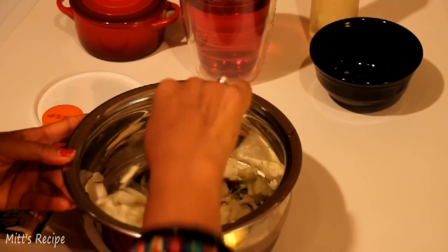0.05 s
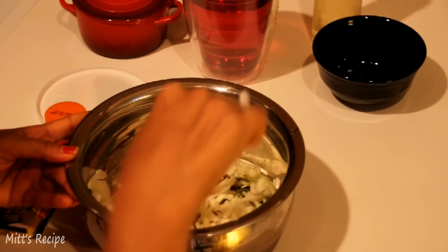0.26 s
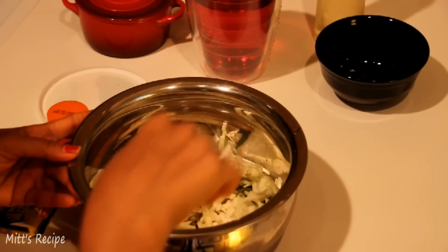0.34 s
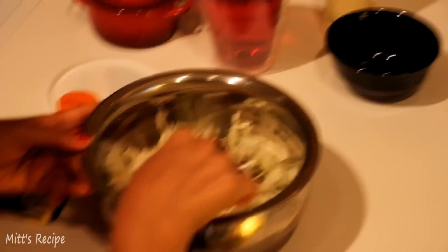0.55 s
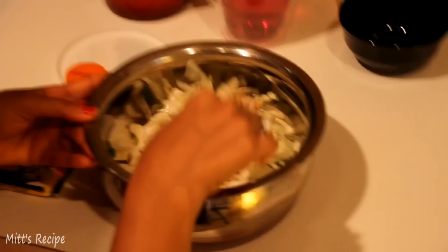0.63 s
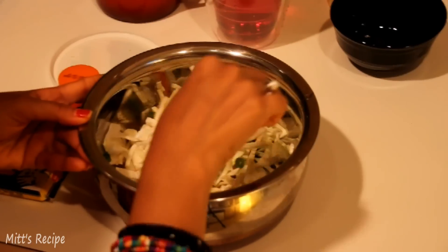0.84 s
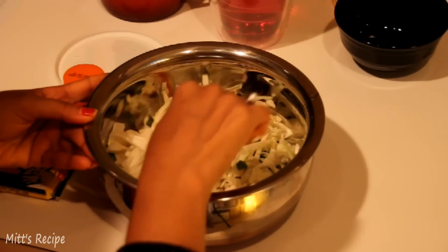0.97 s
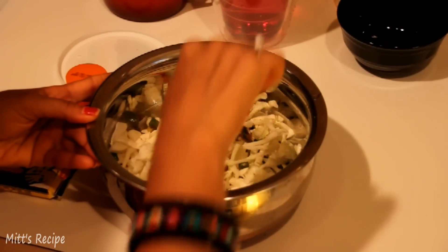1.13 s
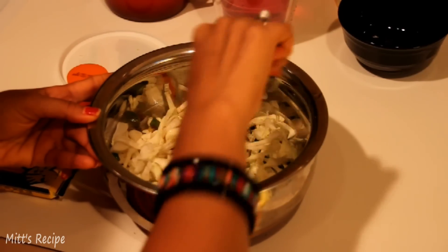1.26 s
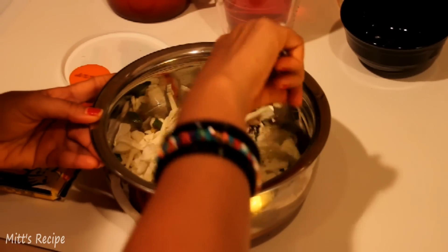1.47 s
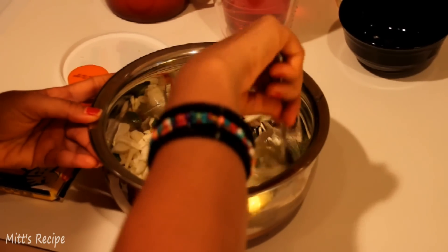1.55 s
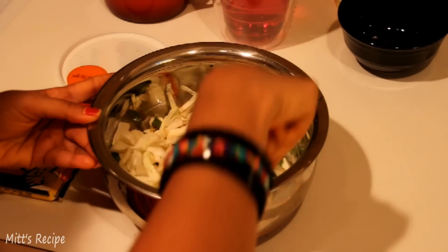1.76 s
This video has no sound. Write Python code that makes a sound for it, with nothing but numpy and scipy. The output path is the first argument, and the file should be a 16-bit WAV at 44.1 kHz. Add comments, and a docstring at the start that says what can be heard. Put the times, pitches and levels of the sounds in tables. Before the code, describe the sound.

A steel bowl bumps a kitchen counter several times while wet cabbage is mixed by hand.

```python
"""A faint wet rustle, then dull knocks: a hand turns shredded cabbage and batter in a steel bowl.
The held bowl bumps the kitchen counter, a low thump under a short, damped ring of steel.
Between knocks the shreds slide, air fizzes, wet fingers squeak, and a chirpy pop meets a soft bump.
Once something hard, probably a finger ring, clinks on the rim and sets it shimmering.
It all sits in the reverb of a small room, over a bed of low noise and mains hum."""
import sys
import numpy as np
from scipy import signal
from scipy.fft import rfft, irfft
from scipy.io import wavfile

SR = 44100
rng = np.random.default_rng(int(sys.argv[2]) if len(sys.argv) > 2 else 0)


def generate_wav(signal):
    """Clip the signal to [-1, 1] and save it as 16-bit WAV at the path in sys.argv[1]."""
    frames = np.transpose(np.atleast_2d(signal))
    scaled = np.clip(frames, -1, 1) * 32767
    pcm = np.round(scaled).astype(np.int16)
    wavfile.write(sys.argv[1], SR, pcm)


N = 79380
T = np.arange(N) / SR

# Levels within a table are relative; each layer's gain and filters come on top.
# Spectrum of the room tone: frequency_hz, level_db
ROOM_TONE_SPECTRUM = [(40, -6), (80, -3.5), (130, -4), (180, 2.5), (230, -2), (310, 2), (450, -8),
                      (1000, -7.5), (2000, -15.5), (5000, -23.5), (15000, -33.5)]
# Spectrum of the kitchen's reverb: frequency_hz, level_db
REVERB_SPECTRUM = [(100, -16), (300, 5.5), (700, 1), (1500, 3), (15000, 4.5)]
# Swells and lulls of the wet rustle: time_s, level_db
RUSTLE_ENVELOPE = [(0, -49), (.13, -46), (.2, -46.5), (.42, -78), (.55, -48), (.63, -45), (.69, -36),
                   (.75, -43.5), (.86, -57), (1.0, -58.5), (1.05, -48.5), (1.11, -49.5), (1.2, -50.5),
                   (1.29, -71), (1.55, -48), (1.68, -52), (1.78, -52)]
# Spectrum of the sliding shreds: frequency_hz, level_db
RUSTLE_SPECTRUM = [(150, 7.5), (500, 3.5), (1200, 0), (5000, -9.5), (9000, -16), (15000, -16.5)]
# Air fizzing out of the batter: start_s, level_db, rise_s, pitch_hz
AIR_SQUELCHES = [(0.572, -41.5, 0.016, 12300), (.683, -48, 0.0067, 11800), (1.015, -55, 0.063, 12900),
                 (1.606, -46.5, 0.0098, 11800), (1.705, -52, 0.027, 12100)]
# Wet fingers slipping on steel: start_s, level_db, pitch_hz
FINGER_SQUEAKS = [(.576, -41, 9760), (0.618, -42, 8610), (.689, -42, 5330)]
# Fingers brushing the bowl's wall: start_s, level_db, wall_hz
FINGER_TAPS = [(.1322, -27.5, 1132), (.281, -36, 1700), (.783, -38.5, 1110), (1.774, -40.5, 1280)]
# The hand pressing the bowl down: start_s, level_db
PRESS_THUDS = [(.698, -26), (0.7189, -15)]
# Modes of the free rim: pitch_hz, level_db, t60_s
RIM_MODES = [(573, -1, .19), (1136, -5, .25), (1476, -6, .17), (2853, -8, .28), (3010, -6, .19),
             (4073, -2, .23), (4840, -4, .2), (4950, -3, .33), (5674, 0.5, .27), (6420, -2, .26),
             (7580, -9, .2), (7850, 1, .17), (8410, -3, .15), (8549, -8, .29), (9205, -2, .22),
             (9848, -6, .19), (10540, -5, .15), (11200, -8, .15), (11930, -12, .17), (12647, -3, .14)]
# Spectrum of the rim's dense, weaker modes: frequency_hz, level_db
SHIMMER_SPECTRUM = [(300, -13), (460, -17), (600, 4), (780, -4.5), (1200, 2.5), (1900, -4.5), (2400, -13),
                    (3000, 1), (3600, -18), (4200, -1.5), (6200, 1), (6900, -8.5), (8000, -1),
                    (16000, -14.5)]
# Modes of the damped bowl on the counter: pitch_hz, level_db, t60_s
BOWL_MODES = [(488, -28.5, 0.043), (661, -21, 0.04), (854, -16, 0.062), (1143, -13.5, 0.042),
              (1320, -12, 0.043), (1594, -14, 0.036), (1706, -15.5, 0.035), (1887, -10.5, 0.031),
              (2188, -21.5, 0.032), (2820, -15.5, 0.018), (3280, -14, 0.024), (3790, -19.5, 0.019),
              (4816, -17, 0.017), (5470, -10.5, 0.0062), (6290, -24, 0.0085)]
# Spectrum of the diffuse wash after a knock: frequency_hz, level_db
WASH_SPECTRUM = [(150, 4), (500, 5.5), (900, 3), (1800, 3.5), (2400, 1), (3300, 1), (5500, -5.5),
                 (8000, -6.5), (12000, -4), (16000, -8.5)]
# Knocks on the bowl, plus a small chirpy pop and a soft bump (third and fourth rows):
# start_s, level_db, brightness_hz, thump_hz, thump_db, wall_hz, wall_db,
# node_hz, snap_hz, snap_db, snap_q, touch_lead_s
BOWL_HITS = [(0.2144, -1.5, 11300, 239, -12.5, 1267, -14.5, 1400, 3580, 5.7, 2.3, 0.0024),
             (0.4704, -7, 4230, 243, -9, 790, -23.5, 1000, 3500, -8, 1.9, 0.0011),
             (0.6579, -19, 2980, 270, -13, 1870, 12.5, 1290, 3200, 0, 2.5, 0.0089),
             (0.6646, -19, 2920, 447, -13.5, 970, -5, 1330, 4800, 9, 3.1, 0.0035),
             (0.8977, -5.5, 8100, 301, -14.5, 1002, -13, 850, 5720, 8, 1.47, 0.0034),
             (1.401, -4.3, 5400, 345, -17.5, 1058, -10.5, 1570, 4870, 8.5, 4.1, 0.0029)]

WALL_T60_S, CRACK_T60_S = 0.042, 0.018  # shared by taps and hits


def from_db(db):
    """Decibels to gain."""
    return 10 ** (np.asarray(db) / 20)


def unit_power(x):
    """Scale to an RMS of one."""
    return x / np.sqrt(np.mean(x ** 2) + 1e-20)


def cut(x, hz, kind, order=2):
    """Butterworth low- or high-pass."""
    return signal.sosfilt(signal.butter(order, hz, kind, fs=SR, output="sos"), x + 1e-18)


def colour(x, spectrum):
    """EQ a steady sound to a spectrum, at unit power."""
    hz, db = np.transpose(spectrum)
    bins_hz = np.maximum(np.fft.rfftfreq(N, 1 / SR), 1)
    gain = from_db(np.interp(np.log(bins_hz), np.log(hz), db))
    return unit_power(irfft(rfft(x) * gain, N))


def resonate(x, hz, q):
    """A resonant band-pass."""
    return signal.lfilter(*signal.iirpeak(hz, q, fs=SR), x + 1e-18)


def noise():
    """White noise."""
    return rng.standard_normal(N)


def decay(t60_s):
    """An exponential fade, 60 dB down after t60_s."""
    return np.exp(-np.minimum(np.log(1000) * T / t60_s, 60))


def ring(hz, t60_s):
    """One struck mode."""
    return np.sin(2 * np.pi * hz * T) * decay(t60_s)


def at(start_s, x):
    """Place a sound on the timeline."""
    return np.concatenate([np.zeros(max(int(start_s * SR), 0)), x])[:N]


def through(x, response):
    """Convolve with an impulse response scaled to unit energy."""
    return signal.fftconvolve(x, unit_power(response) / np.sqrt(N))[:N]


def room_tone(hum_hz=119.1):
    """The bed: steady low noise and mains hum."""
    hum = np.sqrt(2) * np.sin(2 * np.pi * hum_hz * T)
    return from_db(-48) * colour(noise(), ROOM_TONE_SPECTRUM) + from_db(-57) * hum


def kitchen_reverb(send, split_hz=13000, predelay_s=0.007):
    """Diffuse reflections whose treble dies sooner."""
    wash = colour(noise(), REVERB_SPECTRUM)
    lows = cut(wash, split_hz, "low", order=1) * decay(t60_s=0.59)
    highs = cut(wash, split_hz, "high", order=1) * decay(t60_s=0.37)
    return from_db(-14.5) * at(predelay_s, through(send, lows + highs))


def wet_pops(per_s, bands=48, spread_db=3, width_hz=200):
    """Tiny wet pops of uneven size and pitch, each ringing briefly."""
    sizes = from_db(spread_db * np.minimum(rng.exponential(1, N), 4)) * rng.choice([-1, 1], N)
    pops = sizes * (rng.random(N) < per_s / SR)
    band_of_pop = rng.integers(0, bands, N)
    out = np.zeros(N)
    for band, hz in enumerate(np.linspace(400, 15600, bands)):
        out += resonate(pops * (band_of_pop == band), hz, q=hz / width_hz)
    return unit_power(out)


def spurt(froth, rise_s, hz, width_hz):
    """A quick swell of pops through a resonance: a wide one fizzes, a narrow one squeaks."""
    swell = T / rise_s * np.exp(1 - T / rise_s)
    q = hz / width_hz
    return swell * unit_power(resonate(resonate(froth, hz, q), hz, q))


def wet_cabbage(rim):
    """Shreds slide and pop, air fizzes out, fingers squeak, and the rubbing makes the rim sing faintly."""
    sliding = colour(wet_pops(per_s=5000) + 0.87 * noise(), RUSTLE_SPECTRUM)
    out = sliding * from_db(np.interp(T, *np.transpose(RUSTLE_ENVELOPE)))
    froth = wet_pops(per_s=8000)
    for start_s, level_db, rise_s, pitch_hz in AIR_SQUELCHES:
        out += from_db(level_db) * at(start_s, spurt(froth, rise_s, pitch_hz, width_hz=6100))
    for start_s, level_db, pitch_hz in FINGER_SQUEAKS:
        out += from_db(level_db) * at(start_s, spurt(froth, rise_s=0.0032, hz=pitch_hz, width_hz=730))
    return out + from_db(-15) * through(out, rim)


def bowl_modes():
    """The damped bowl's short rings, one a row, in alternating polarity."""
    return np.array([(-1) ** k * from_db(db) * ring(hz, t60)
                     for k, (hz, db, t60) in enumerate(BOWL_MODES)])


def finger_taps():
    """Soft taps sound the wall tone and the bowl's modes, with a small tick."""
    body = from_db(0.5) * bowl_modes().sum(axis=0)
    tick = from_db(-2) * noise() * decay(CRACK_T60_S)
    out = np.zeros(N)
    for start_s, level_db, wall_hz in FINGER_TAPS:
        out += from_db(level_db) * at(start_s, body + tick - ring(wall_hz, WALL_T60_S))
    return cut(out, 4500, "low")


def press_thuds():
    """Soft, low pushes through the bowl into the counter."""
    thud = -ring(hz=145, t60_s=0.012)
    pushes = sum(from_db(level_db) * at(start_s, thud) for start_s, level_db in PRESS_THUDS)
    return cut(pushes, 60.5, "high")


def rim_ring(mean_twin_gap_hz=68.3, flutter_depth=0.3, flutter_hz=45, stagger_s=0.0015):
    """The rim's wavering ring: the bowl is not quite round, so each mode beats with a higher twin."""
    out = np.zeros(N)
    for k, (pitch_hz, level_db, t60_s) in enumerate(RIM_MODES):
        twin_hz = pitch_hz + mean_twin_gap_hz * (0.5 + rng.random())
        pair = ring(pitch_hz, t60_s) - from_db(-5) * ring(twin_hz, t60_s)
        flutter = 1 + flutter_depth * unit_power(cut(noise(), flutter_hz, "low"))
        out += at(rng.uniform(0, stagger_s), (-1) ** k * from_db(level_db) * pair * flutter)
    return out


def rim_clink(rim, start_s=1.4545):
    """One hard tap sets the rim ringing over a shimmer of weaker modes."""
    shimmer = from_db(-20) * colour(noise(), SHIMMER_SPECTRUM) * decay(t60_s=0.21)
    return at(start_s, from_db(-26.5) * rim + shimmer)


def bowl_hits(node_dip_db=-13.5, node_log_width=0.049, thump_rise_s=0.00073):
    """Knocks thump, ring and chatter in the damped bowl; the same layers voice the pop and the bump."""
    out = np.zeros(N)
    modes = bowl_modes()
    modes_hz = np.array(BOWL_MODES)[:, 0]
    for (start_s, level_db, brightness_hz, thump_hz, thump_db, wall_hz, wall_db,
         node_hz, snap_hz, snap_db, snap_q, touch_lead_s) in BOWL_HITS:
        # Modes with a node at the contact stay weak.
        near_node = np.exp(-0.5 * (np.log(modes_hz / node_hz) / node_log_width) ** 2)
        body = from_db(node_dip_db * near_node) @ modes
        # The wall tone shifts from knock to knock as hand and batter move round the bowl.
        body += from_db(wall_db) * ring(wall_hz, WALL_T60_S)
        thump = from_db(thump_db) * ring(thump_hz, t60_s=0.042) * (1 - np.exp(-T / thump_rise_s))
        rattle = cut(noise() * decay(t60_s=0.024), 396, "high")
        chatter = from_db(-7.5) * through(body, rattle)
        crack = from_db(-8.5) * cut(noise() * decay(CRACK_T60_S), 1350, "high")
        wash = from_db(-28.5) * colour(noise(), WASH_SPECTRUM) * decay(t60_s=0.31)
        hit = thump + body + chatter + crack + wash
        hit += (from_db(snap_db) - 1) * resonate(hit, snap_hz, snap_q)  # bell EQ on the treble snap
        out += from_db(level_db) * at(start_s, cut(hit, brightness_hz, "low"))
        # A soft, dull touch leads each hit; in a knock, one edge of the base lands first.
        out += from_db(level_db - 13) * at(start_s - touch_lead_s, cut(body, 1700, "low"))
    return out


def scene():
    """The mono mix of bowl, batter and room, with hits and taps kept drier than the rest."""
    rim = rim_ring()
    impacts = cut(bowl_hits() + finger_taps(), 171, "high")
    handling = rim_clink(rim) + press_thuds() + wet_cabbage(rim)
    bed = room_tone()
    reverb = kitchen_reverb(handling + from_db(-9.5) * impacts)
    return (bed + reverb + handling + impacts)[None]


def record(dry, cutoff_hz=15950):
    """Full-scale clipping and a steep top cut."""
    top_cut = signal.ellip(10, 0.1, 80, cutoff_hz, fs=SR, output="sos")
    return signal.sosfilt(top_cut, np.clip(dry, -1, 1))


dry = scene()
out = record(dry)
generate_wav(out)
```